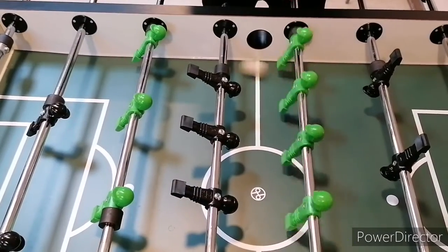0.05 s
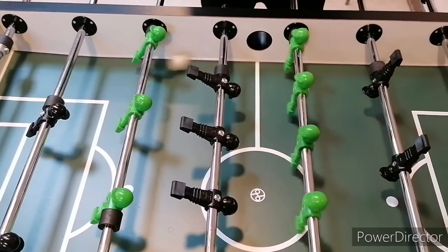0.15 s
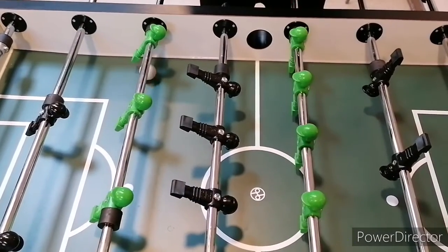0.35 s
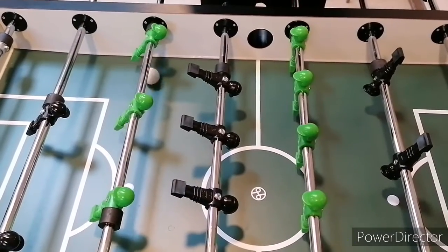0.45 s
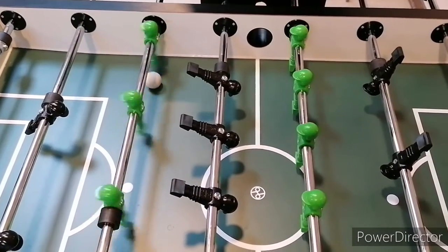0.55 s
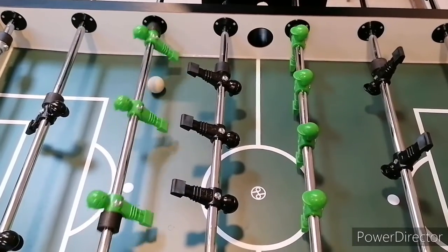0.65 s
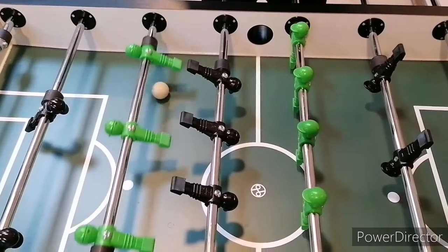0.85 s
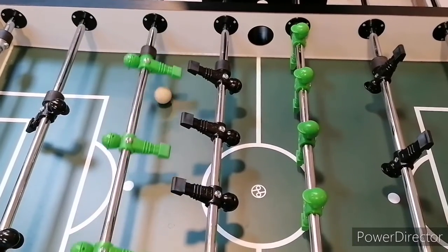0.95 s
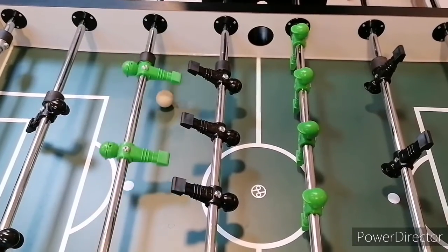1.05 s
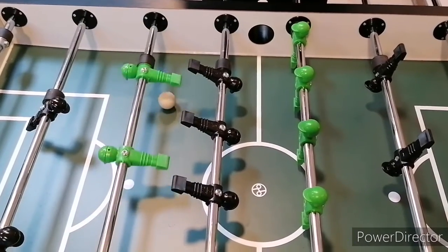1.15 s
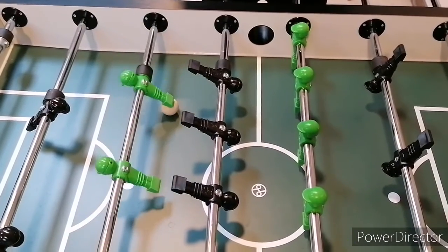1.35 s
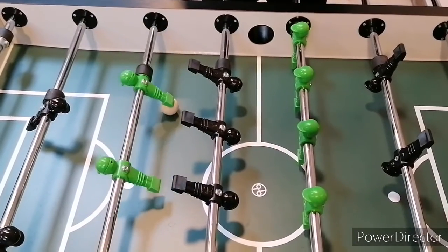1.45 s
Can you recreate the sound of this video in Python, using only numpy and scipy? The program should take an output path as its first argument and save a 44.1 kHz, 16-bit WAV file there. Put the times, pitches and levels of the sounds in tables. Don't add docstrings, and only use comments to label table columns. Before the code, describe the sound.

A foosball ball slams and chatters against the wooden side wall, drops on the board, clips a plastic figure and is blocked by another, then rolls softly while a rod slides; close stereo microphones, lively room.

```python
import sys
import numpy as np
from scipy import signal
from scipy.fft import rfft, irfft, next_fast_len
from scipy.io import wavfile
from scipy.ndimage import map_coordinates

SR = 44100
rng = np.random.default_rng(int(sys.argv[2]) if len(sys.argv) > 2 else 0)


def rack_gain(trim_db):
    fader = np.asarray(trim_db, float)
    return 10 ** (fader / 20)


def generate_wav(signal):
    frames = np.transpose(np.atleast_2d(signal))
    scaled = np.clip(frames, -1, 1) * 32767
    pcm = np.round(scaled).astype(np.int16)
    wavfile.write(sys.argv[1], SR, pcm)


N = 66150


def unit(x):
    return x / np.sqrt(np.mean(x ** 2) + 1e-20)


def along(points, hz):
    f, value = np.transpose(points)
    return np.interp(np.log(hz + 1), np.log(f + 1), value)


def curve(rows):
    s, value = np.transpose(rows)
    return np.interp(np.arange(N) / SR, s, value)


def filtered(x, response):
    m = next_fast_len(x.shape[-1] + SR // 2)
    spectrum = rfft(x, m) * response(np.fft.rfftfreq(m, 1 / SR))
    return irfft(spectrum, m)[..., :x.shape[-1]]


def low_cut(hz, corner_hz):
    return (1j * hz / (corner_hz + 1j * hz)) ** 2


def peaks(table):
    def response(f):
        total = 0
        for k, (centre, width, db) in enumerate(table):
            band = 1j * f * width
            total = total + (-1) ** k * rack_gain(db) * band / (centre ** 2 - f ** 2 + band)
        return total
    return response


def paired(pair, alike):
    def mid_side(hz):
        turn = np.arccos(np.clip(along(alike, hz), -1, 1)) / 2
        return np.array([np.cos(turn), np.sin(turn)])
    mid, side = filtered(pair, mid_side)
    return np.array([mid + side, mid - side])


def pan(db):
    return rack_gain([[db / 2], [-db / 2]])


def wobble(rate):
    knots = rng.standard_normal(int(N * rate / SR) + 4)
    return map_coordinates(knots, [np.arange(N) * rate / SR])


def hum(hz, turn):
    waver_hz, waver_db, wavers_per_s = 5, 1.5, 30
    phase = 2 * np.pi * np.cumsum(hz + waver_hz * wobble(wavers_per_s)) / SR
    level = np.sqrt(2) * rack_gain(waver_db * wobble(wavers_per_s))
    return level * np.array([np.sin(phase), np.sin(phase + turn)])


def rush(tone, length, alike):
    noise = filtered(rng.standard_normal((2, length)), lambda hz: rack_gain(along(tone, hz)))
    return unit(paired(noise, alike))


# (frequency [Hz], t60 [s])
ROOM_T60 = [(60, 1.1), (250, 0.45), (800, 0.44), (2000, 0.46), (6000, .5), (14000, 0.25)]
# (frequency [Hz], level [dB])
ROOM_TONE = [(50, -0.5), (120, 6.5), (270, 0), (600, 4), (2000, -4), (8000, -4.5)]
# (frequency [Hz], likeness [-1..1])
ROOM_ALIKE = [(100, 0.94), (500, 0.81), (1500, 0.16), (10000, 0.078)]


def room(x):
    room_db, delay = -12, 200
    hz, t, z = signal.stft(rng.standard_normal((2, SR)), SR, nperseg=256)
    fall_db = along(ROOM_TONE, hz)[:, None] - 60 * t / along(ROOM_T60, hz)[:, None]
    tail = signal.istft(z * rack_gain(fall_db), SR, nperseg=256)[1]
    tail = paired(tail, ROOM_ALIKE)
    tail = tail / np.linalg.norm(tail[0])
    return rack_gain(room_db) * signal.fftconvolve(np.pad(x, (delay, 0))[None], tail, axes=1)[:, :N]


# (frequency [Hz], level [dB per Hz])
AIR = [(25, 10.5), (60, 0), (280, 0.5), (550, -7), (1000, -10.5), (3000, -29), (9000, -28.5), (15300, -33)]
# (frequency [Hz], likeness, held within -1..1)
AIR_ALIKE = [(60, 0.34), (380, 0.097), (2380, -1.5), (15000, -0.44)]
# (frequency [Hz], width [Hz], level [dB])
RUMBLE = [(47, 40, 0.5)]
# (frequency [Hz], likeness [-1..1])
RUMBLE_ALIKE = [(50, 0.99)]


def air():
    air_db, rumble_db = -70, -73
    lump_db, lumps_per_s = 5, 14
    low = paired(filtered(rng.standard_normal((2, N)), peaks(RUMBLE)), RUMBLE_ALIKE)
    quiet = rush(AIR, N, AIR_ALIKE)
    thuds = unit(low * rack_gain(lump_db * wobble(lumps_per_s)))
    return rack_gain(air_db) * quiet + rack_gain(rumble_db) * thuds


# (time [s], rod speed as level [dB])
SLIDE = [(0, -67.5), (.1, -70), (.2, -70.5), (.55, -67), (.68, -70), (.72, -67), (.745, -72), (.77, -66),
         (.8, -72.5), (.9, -75.5), (1.02, -71.5), (1.14, -70), (1.19, -69), (1.25, -73), (1.31, -78),
         (1.5, -79)]
# (frequency [Hz], width [Hz], level [dB])
BEARING = [(283, 100, -1), (810, 347, -0.5), (1600, 260, -1.5), (2100, 290, -2), (2920, 396, -4.5),
           (3440, 720, -8), (5670, 1830, -14.5), (10050, 1900, -22)]


def sliding():
    slips_per_s, slip_db, slide_db = 15000, 1, 3.5
    pan_db, lag_s = 1.1, .0004
    slips = (rng.random((2, N)) < slips_per_s / SR) * rng.standard_normal((2, N))
    slips = slips * rack_gain(slip_db * rng.standard_normal((2, N)))
    pair = unit(paired(filtered(slips, peaks(BEARING)), ROOM_ALIKE))
    half = np.array([[.5], [-.5]])
    placed = filtered(pair, lambda hz: rack_gain(half * pan_db) * np.exp(2j * np.pi * hz * half * lag_s))
    return rack_gain(curve(SLIDE) + slide_db) * placed


# (time [s], level [dB])
ROLL = [(.55, -54.5), (.66, -60.5), (.76, -67.5), (.82, -71.5), (.95, -66), (1.06, -64), (1.22, -67),
        (1.3, -81), (1.5, -83)]
# (time [s], level [dB])
GRIP = [(0.74, -87), (0.8, -68.5), (0.846, -83.5), (0.886, -69.5), (0.926, -97), (1.002, -65.5),
        (1.026, -75), (1.048, -102), (1.074, -73), (1.114, -66.5), (1.152, -87), (1.178, -71.5),
        (1.286, -71.5), (1.298, -85), (1.38, -70.5), (1.434, -92.5), (1.478, -72.5), (1.5, -85.5)]
# (time [s], length [s], frequency [Hz], level [dB])
SQUEAKS = [
    (1.205, .014, 815, -65),
    (1.24, .015, 800, -71),
    (1.16, .012, 780, -72),
    (1.13, .04, 2110, -78),
    (.718, .006, 9300, -89),
    (1.26, .03, 10150, -92),
]
# (frequency [Hz], level [dB], t60 [s])
LAST_RING = [(297, -68, 1), (533, -75, .9), (770, -78, 0.45), (890, -75.5, 0.31)]


def rolling():
    t = np.arange(N) / SR
    board_hz, skin_hz, skin_sag_hz_per_s = 122, 558, 15
    squeak_rise_per_s = .25

    def after(s):
        return np.clip((t - s) / 0.061, 0, 1)

    out = rack_gain(curve(ROLL)) * after(.5) * hum(board_hz, turn=0.51)
    out = out + rack_gain(curve(GRIP)) * after(0.64) * hum(skin_hz - skin_sag_hz_per_s * (t - 1), turn=0.21)
    for s, length, hz, db in SQUEAKS:
        swell = rack_gain(db) * np.exp(-((t - s) / length) ** 2)
        out = out + swell * hum(hz * (1 + squeak_rise_per_s * (t - s)), turn=1.0)
    for hz, db, t60 in LAST_RING:
        out = out + rack_gain(db - 60 * t / t60) * hum(hz, turn=0.2)
    return pan(-1.7) * out


# (frequency [Hz], level [dB])
HARD_CRACK = [(200, -14), (700, 2.5), (2000, -2), (3500, 3.5), (7500, -7), (10000, -12), (12500, -35),
              (15000, -47.5)]
# (frequency [Hz], likeness [-1..1])
BODY_ALIKE = [(200, 0.82), (700, 0.4), (1250, -0.14), (2500, -0.08), (6000, -0.084)]


def strikes(hits, modes, body, low_hz, room_db, pan_db, push=1, crack_tone=HARD_CRACK, crack_t60=0.011):
    attack_s, scatter_db, detune = .00025, 2, .02
    body_db, body_t60 = -9, 0.059
    longest_cycles, pivot_hz = 70, 1000
    port_spread_hz = 1400
    far_ring_db, far_ring_hz = -13, 300
    far_body_db = 5.5
    near, far = np.zeros((2, N + SR)), np.zeros(N + SR)
    t = np.arange(SR // 4) / SR
    centre, db, t60 = np.transpose(modes)[:, :, None]
    t60 = np.minimum(t60, longest_cycles / centre)
    spread = centre ** 2 / (centre ** 2 + port_spread_hz ** 2)
    lead = rng.uniform(-1, 1, centre.shape) * np.pi / 2 * spread
    for s, ring_db, crack_db, hard_db in hits:
        start = int(s * SR)
        u = np.maximum(t - (s - start / SR), 0)
        hz = centre * (1 + detune * rng.standard_normal(centre.shape))
        mode_db = db + hard_db * np.log2(hz / pivot_hz) + scatter_db * rng.standard_normal(hz.shape)
        size = push * rack_gain(mode_db - 60 * u / t60)
        partials = size * np.array([np.sin(2 * np.pi * hz * u + side * lead) for side in (1, -1)]) / 2
        dense = rack_gain(body_db - 60 * u / body_t60) * rush(body, len(t), BODY_ALIKE)
        crack = rack_gain(crack_db - 60 * t / crack_t60) * rush(crack_tone, len(t), BODY_ALIKE)
        rise = rack_gain(ring_db) * (1 - np.exp(-u / attack_s))
        near[:, start:start + len(t)] += rise * (partials.sum(1) + dense) + crack
        far_ring = (rack_gain(far_ring_db * (centre > far_ring_hz)) * partials[0]).sum(0)
        far[start:start + len(t)] += rise * (far_ring + rack_gain(far_body_db) * dense[0]) + crack[0]
    direct = filtered(near[:, :N], lambda f: low_cut(f, low_hz))
    answer = room(filtered(far[:N], lambda f: low_cut(f, low_hz)))
    return pan(pan_db) * direct + rack_gain(room_db) * answer


# (time [s], ring level [dB], crack level [dB], hardness [dB per octave])
GLANCES = [
    (.3016, -23.5, -54, 7),
    (.3329, -14.5, -40, 3.5),
    (.3405, -21.5, -54.5, -4),
    (.3829, -37.5, -67, 2.5),
    (.4050, -29, -70.5, -0.5),
    (.4200, -40, -70.5, -2),
]
# (frequency [Hz], level [dB], t60 [s])
SHIN = [(238, -10, .08), (575, -17, 0.052), (680, -11, 0.042), (773, -2.5, .045), (900, -10.5, 0.03),
        (1047, -7.5, 0.03), (1414, -7.5, 0.02), (1680, -12.5, 0.037), (1990, -13.5, .05)]
# (frequency [Hz], level [dB])
SHIN_BODY = [(200, -13), (500, 2), (900, 7.5), (1900, 1.5), (2500, -17.5), (5000, -32), (12000, -51)]


def shin_glances():
    return strikes(GLANCES, SHIN, SHIN_BODY, low_hz=143, room_db=-1.3, pan_db=-1.0, push=-0.78)


# (time [s], ring level [dB], crack level [dB], hardness [dB per octave])
BLOCKS = [
    (.4338, -39, -38, 2),
    (.4354, -15, -30, 0.5),
    (.4395, -19.5, -42, 0),
    (.4425, -25, -39.5, 2),
    (.4455, -25.5, -44, -3.5),
    (.4590, -42, -45.5, 0),
]
# (frequency [Hz], level [dB], t60 [s])
FOOT = [(495, -4.5, 0.022), (575, -7.5, 0.07), (655, -4.5, 0.03), (780, -5, 0.043), (970, -8, 0.015),
        (1020, -11, 0.03), (1452, -8.5, 0.03), (1755, -5, 0.02), (2052, 2, 0.05), (2230, -8.5, 0.01),
        (2700, -15, 0.044), (3562, -13.5, .02), (5850, -14.5, 0.03), (8600, -25.5, .012)]
# (frequency [Hz], level [dB])
FOOT_BODY = [(250, -13), (450, 0.5), (800, 6), (1400, -5), (2100, 1.5), (2800, -7), (6000, -32),
             (12000, -47.5)]


def foot_blocks():
    return strikes(BLOCKS, FOOT, FOOT_BODY, low_hz=300, room_db=-1.3, pan_db=-0.4)


# (time [s], ring level [dB], crack level [dB], hardness [dB per octave])
DROPS = [
    (.2609, -15, -28.5, 0.5),
    (.2720, -29.5, -44.5, 3),
    (.2866, -21.5, -46.5, 1.5),
    (.2936, -27, -56, 2),
    (.3215, -31.5, -57.5, -4),
    (.3460, -36, -62, 4.5),
    (.3650, -39.5, -60, 2.5),
    (.4485, -28.5, -61, -1.5),
    (.4620, -29.5, -64.5, 0),
    (.4830, -33.5, -70.5, -1),
]
# (frequency [Hz], level [dB], t60 [s])
PLAYFIELD = [(52, -10.5, .4), (110.5, -14.5, 0.17), (203.6, -14.5, 0.035), (256, 2.5, 0.049),
             (340, -4.5, 0.029), (535, -10.5, .04), (690, -16.5, .05), (1255, -21.5, 0.046),
             (1540, -23, 0.035), (1926, -23.5, .04)]
# (frequency [Hz], level [dB])
FIELD_BODY = [(60, -5), (150, 3), (400, 3), (900, -15), (2000, -15), (4000, -27), (12000, -51)]
# (frequency [Hz], level [dB])
ROD_RATTLE = [(1000, 1.5), (5000, -18.5), (9500, -6.5), (12000, -22), (15000, -36.5)]


def playfield_drops():
    return strikes(DROPS, PLAYFIELD, FIELD_BODY, low_hz=55, room_db=-1.0, pan_db=1.44, push=0.83,
                   crack_tone=ROD_RATTLE, crack_t60=0.028)


# (time [s], ring level [dB], crack level [dB], hardness [dB per octave])
WALL_HITS = [
    (.2158, -46, -51, 1.5),
    (.2181, -17, -31.5, 4),
    (.2222, -25.5, -31, 5.5),
    (.2248, -18, -25.5, 1),
    (.2283, -26, -41, 2),
    (.2322, -14, -38, -0.5),
    (.2388, -19, -30.5, -1.5),
    (.2445, -20, -41, -3.5),
    (.2575, -33, -34.5, -0.5),
]
# (frequency [Hz], level [dB], t60 [s])
WALL = [(111, -10, 0.12), (275, -9.5, 0.053), (392.3, -3.5, 0.043), (670.6, -2, 0.04), (806, -4.5, 0.064),
        (968, -8.5, 0.024), (1273, -8.5, 0.0097), (1505, -12, 0.054), (1797, -4, 0.017), (1922, -7, 0.064),
        (2484, -18.5, 0.0067), (3003, -18, .03), (3980, -17, 0.05), (4470, -21, .03)]
# (frequency [Hz], level [dB])
WALL_BODY = [(100, -4.5), (300, 2), (520, -2.5), (850, -1), (2000, 0), (2600, -15), (5000, -24),
             (12000, -58)]


def wall_slam():
    return strikes(WALL_HITS, WALL, WALL_BODY, low_hz=60.0, room_db=-1.9, pan_db=0.9)


def scene():
    contacts = wall_slam() + playfield_drops() + shin_glances() + foot_blocks()
    return contacts + rolling() + sliding() + air()


def low_pass(x):
    return signal.sosfilt(signal.butter(12, 15590, fs=SR, output="sos"), x)


def record(dry):
    low_cut_hz, top_hz = 38, 15400
    mix = filtered(dry, lambda hz: (hz < top_hz) * low_cut(hz, low_cut_hz))
    return low_pass(mix)


dry = scene()
out = record(dry)
generate_wav(out)
```